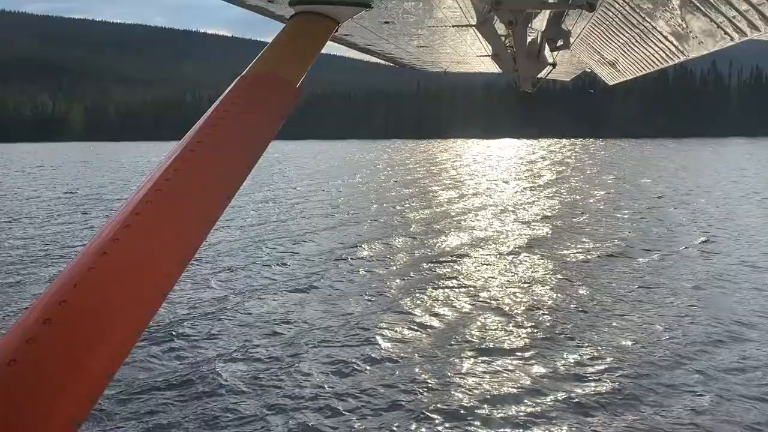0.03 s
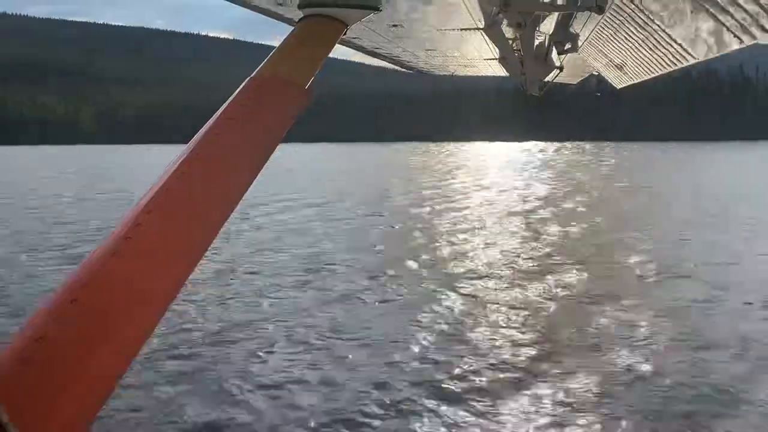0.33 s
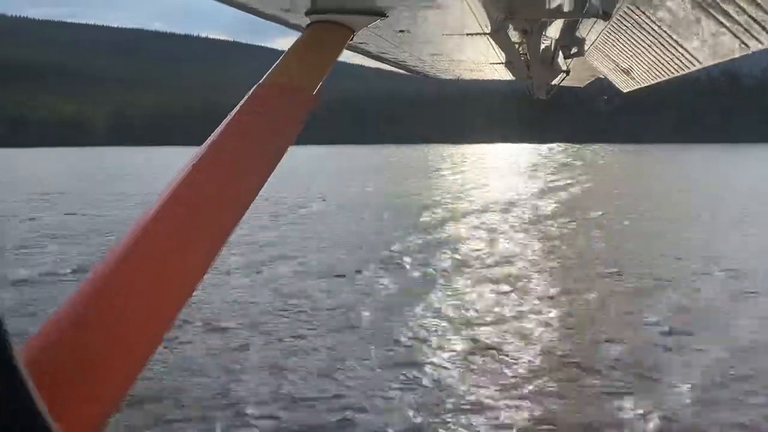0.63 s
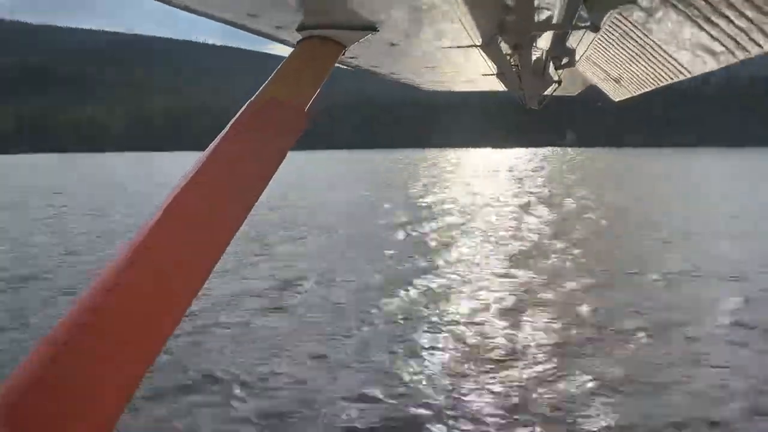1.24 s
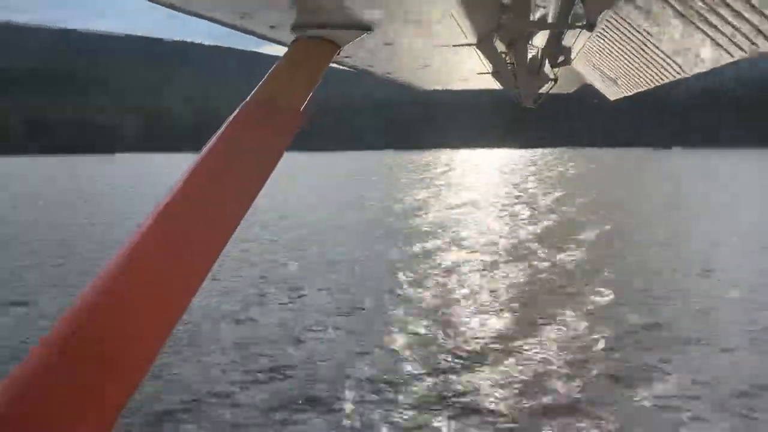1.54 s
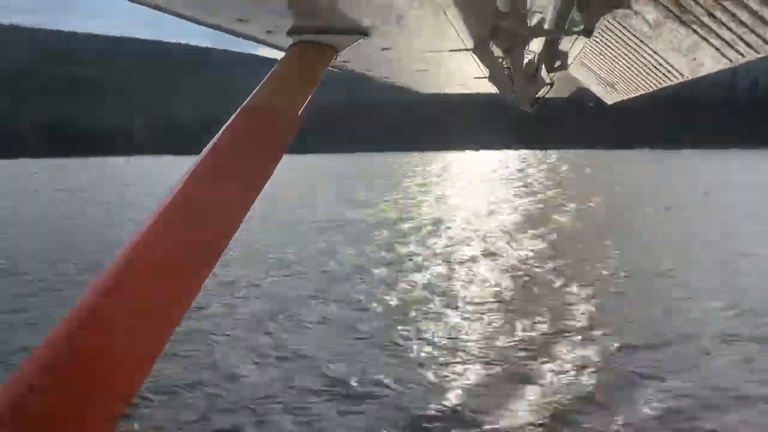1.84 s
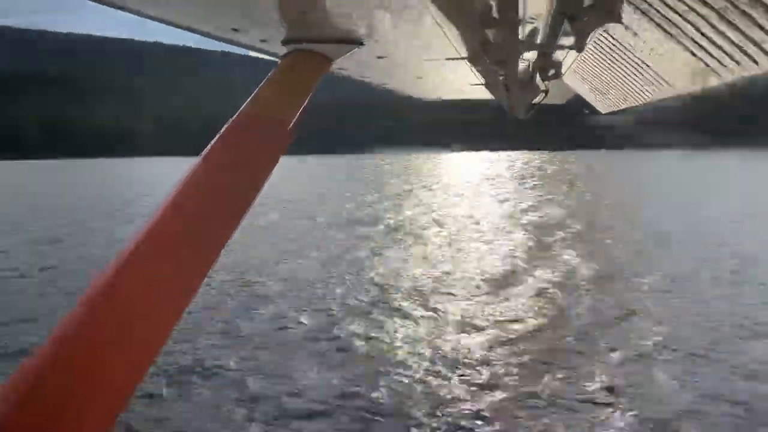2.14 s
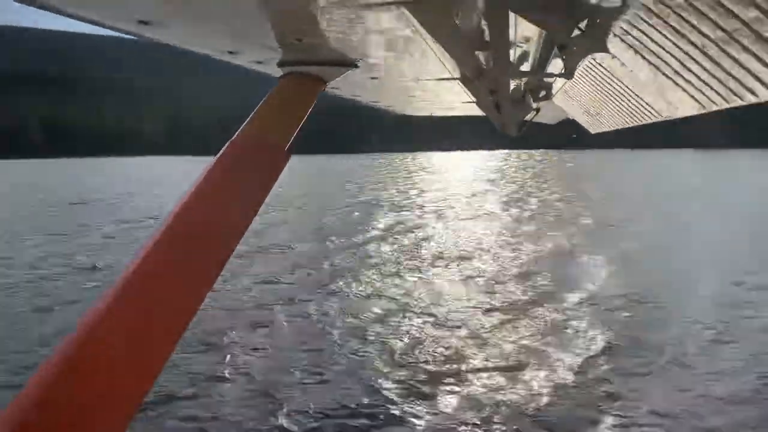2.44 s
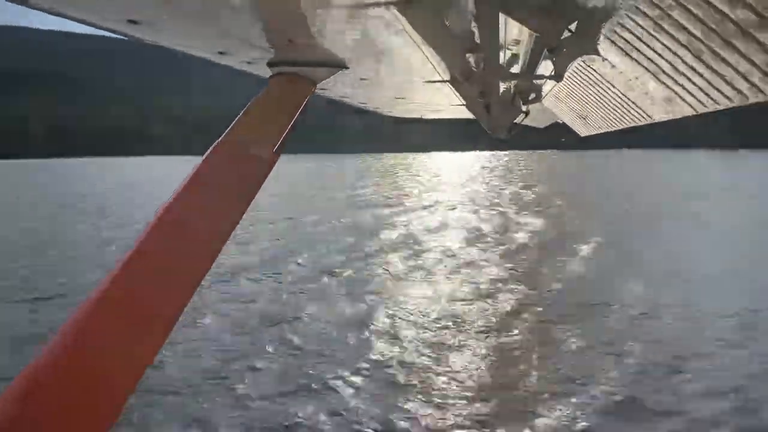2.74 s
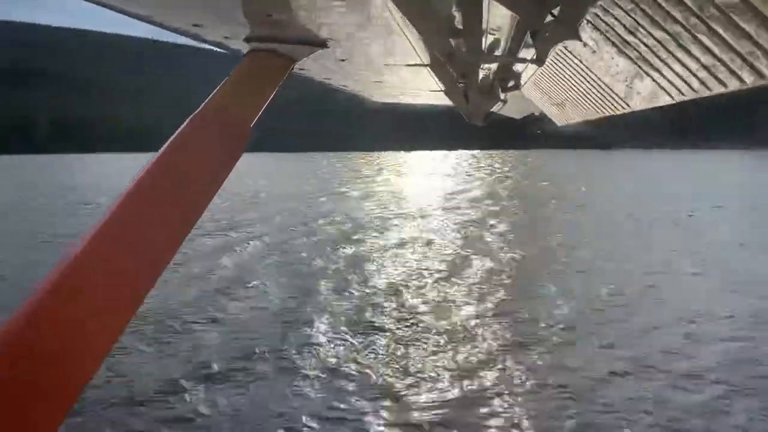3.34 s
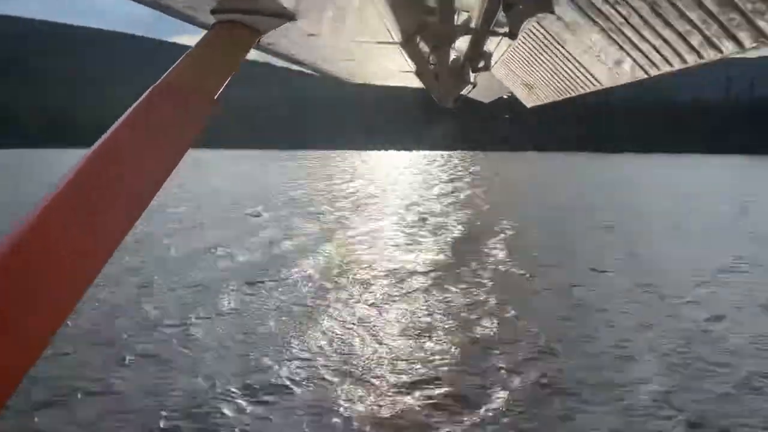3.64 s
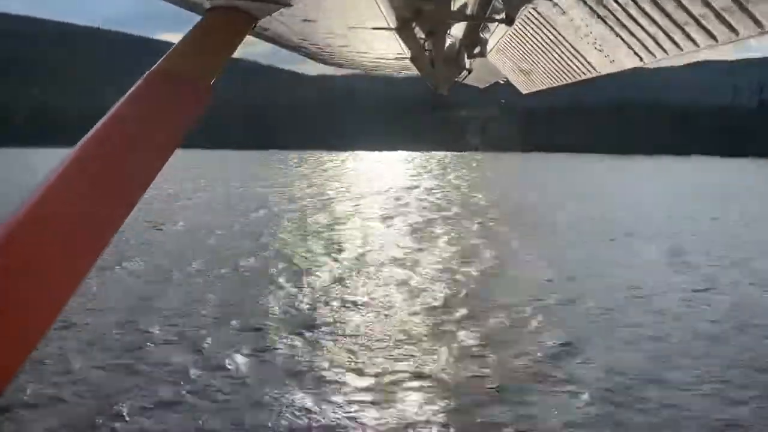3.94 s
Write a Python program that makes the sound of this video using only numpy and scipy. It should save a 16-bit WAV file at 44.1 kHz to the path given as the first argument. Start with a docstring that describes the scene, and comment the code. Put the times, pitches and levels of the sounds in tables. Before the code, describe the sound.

Steady propeller plane drone heard from the cabin, over buffeting wind and a faint high whine.

```python
"""In the cabin of a turboprop floatplane, beside an open side window, climbing low over a lake.
The propeller's blades beat out a steady drone whose overtones shift in balance. Under it the
slipstream buffets the microphone, roars, hisses and rings in the window opening, while the
compressor whines high above. A limiter holds the peaks."""
import sys
import numpy as np
from scipy import signal
from scipy.fft import rfft, irfft
from scipy.io import wavfile
from scipy.ndimage import uniform_filter1d, minimum_filter1d

SR = 44100
rng = np.random.default_rng(int(sys.argv[2]) if len(sys.argv) > 2 else 0)


def generate_wav(signal):
    """Clip the signal to [-1, 1] and save it as 16-bit WAV at the path in sys.argv[1]."""
    frames = np.transpose(np.atleast_2d(signal))
    scaled = np.clip(frames, -1, 1) * 32767
    pcm = np.round(scaled).astype(np.int16)
    wavfile.write(sys.argv[1], SR, pcm)


N = 176400
TIME_S, BIN_HZ = np.arange(N) / SR, np.arange(N // 2 + 1) * SR / N
LEFT_RIGHT = np.array([[1], [-1]])  # pushes the two channels opposite ways

# Stereo width of the air noise, with the treble hiss alternating between centred and out-of-phase bands
# (frequency [Hz], likeness [0-1], left phase lead [rad], left minus right [dB])
STEREO_WIDTH = [(60, .996, 0, -.6), (130, .97, .05, -.8), (280, .85, .3, -1.8), (450, .62, .4, -1.8),
                (620, .2, .5, -1), (1000, .17, 3.4, 0), (1750, .35, 4, 0), (2500, .6, 6.8, .8),
                (3300, .35, 7.1, 2.5), (5500, .3, 6.8, 3.5), (6900, .35, 6.3, 1.8), (7800, .6, 4.4, 1),
                (8450, .96, 3.1, 0), (9100, .65, 1.5, 0), (10050, .98, 0, 0), (11050, .75, -1.5, 0),
                (12050, .98, -3.1, 0), (13100, .75, -4.7, 0), (14000, .97, -6.3, 0), (15000, .75, -7.6, 0),
                (15500, .95, -9.3, 0)]
# Rings of the window opening (peak time [s], swell sigma [s], pitch [Hz], half width [Hz], level [dB])
WINDOW_RINGS = [(0.28, 0.39, 1540, 68, -40), (1.04, .5, 1480, 86, -43.5), (3.21, 0.29, 1960, 53, -42),
                (2.34, 0.44, 1880, 100, -47), (2.52, .25, 2500, 81, -49.5), (3.2, .4, 2630, 120, -52),
                (3.8, 0.18, 1220, 80, -44), (2.94, .5, 1120, 88, -41.5), (3.83, 0.21, 645, 70, -31),
                (1.95, 0.56, 555, 50, -35.5), (2.1, 0.46, 385, 33, -33), (.25, 0.33, 730, 180, -34.5),
                (3.38, 0.24, 346, 80, -31.5), (3.04, 0.14, 62, 8.4, -18)]
# Compressor tones (multiple of shaft speed [x], base level [dB], left minus right [dB])
COMPRESSOR_TONES = [(6, -63, 5), (8, -66.5, 5), (10, -62, 10), (16, -48.5, -0.5)]
# Fader ride on the highest whine (time [s], gain [dB])
WHINE_RIDE = [(.1, 3), (.7, 0), (1.1, -0.5), (1.5, 2), (1.68, 0), (1.85, 4.5), (2.03, -3), (2.25, 2.5),
              (2.45, -1), (2.68, 3), (2.85, 1), (3.15, -1.5), (3.45, -1), (3.95, 0)]
# Base tone colours of the slipstream's low, middle and top layers (frequency [Hz], density [dB/Hz])
BUFFET_SPECTRUM = [(8, -80), (18, -64), (27, -57), (32, -47.5), (46, -38.5), (60, -30.5), (76, -38),
                   (98, -34.5), (130, -40), (160, -49.5), (260, -65.5), (500, -102)]
ROAR_SPECTRUM = [(90, -75), (150, -50), (195, -42.5), (270, -50), (340, -47.5), (400, -48), (475, -48),
                 (515, -54.5), (570, -53), (660, -58.5), (750, -60.5), (1050, -60.5), (1280, -64),
                 (1500, -65), (1950, -71), (2200, -76.5), (2600, -76), (3500, -86), (6000, -105)]
HISS_SPECTRUM = [(900, -98), (2000, -79.5), (2700, -78), (4200, -81.5), (5200, -81.5), (6300, -82),
                 (7400, -84.5), (8800, -85), (10500, -81.5), (11600, -91.5), (13000, -90), (14000, -88.5),
                 (15700, -97)]
# Fader rides on the wind (time [s], buffet gain [dB], roar gain [dB], hiss gain [dB])
WIND_RIDES = [(.1, -8, 4, 5), (.4, -0.5, 1.5, 3.5), (.7, 0.5, 0.5, 1), (1.1, -1, -.5, 0.5),
              (1.4, 1.5, -1, -.5), (1.75, 3, 0, -0.3), (2.2, 0, -1, -1.2), (2.65, -0.5, -0.5, -0.5),
              (2.86, -6.5, -1.5, -1.5), (3.0, -1, -0.5, 0), (3.32, -1, -0.5, 0), (3.5, -2.5, -1, -1),
              (3.95, 0, 0.5, -1)]
# Brief puffs of hiss (peak time [s], half length [s], boost [dB])
HISS_PUFFS = [(0.924, 0.013, 4)]
# Body of the drone, harmonic by harmonic (time [s], first [dB], second [dB], third [dB], fourth [dB])
DRONE_LEVELS = [(.1, -10, -9.5, -23.3, -41), (.4, -12, -10, -23.5, -50), (.62, -12.5, -11, -23.5, -41),
                (.8, -10, -12, -24, -44), (1.15, -13, -12, -26, -38), (1.4, -15.5, -10.5, -25, -47),
                (1.58, -20.5, -12, -24.5, -44), (1.75, -10, -10.5, -21, -44),
                (1.88, -16.5, -10.5, -25.5, -48), (2.05, -11, -11.5, -26.5, -45),
                (2.5, -8.5, -16, -23.5, -45), (2.95, -10.5, -15, -24.2, -37), (3.1, -8, -19, -21, -26.5),
                (3.25, -8, -25.5, -29.5, -31), (3.42, -8.5, -24, -35, -23.5), (3.55, -7, -27, -36, -31.5),
                (3.75, -7.5, -23.5, -30.5, -33), (3.95, -10.5, -14.5, -29.5, -29.5)]
# Faint upper edge of the drone, plus a thin tone locked at twenty times the blade rate (multiple of blade rate
# [x], early level [dB], late level [dB])
DRONE_OVERTONES = [(5, -39.5, -35.5), (6, -48, -53), (7, -52, -54), (9, -54, -61), (20, -59, -59.5)]

SHAFT_HZ, SHAFT_WANDER, COMPRESSOR_BLADES = 630.43, 0.000178, 16  # wander: share of the speed
WHINE_SCATTER, WHINE_FLICKER_HZ = 0.79, 22
HALO_WIDTH_HZ, HALO_DB, HALO_FLICKER_DB = 220, -47, 1.5  # hiss around the highest whine
BLADE_HZ, BLADE_WANDER, ROAR_CHOP_DEPTH = 108.61, .0025, 0.081  # Hz: propeller blade passes a second
DRONE_FLUTTER_DB, OVERTONE_FLUTTER_DB, OVERTONE_SMEAR_RAD = 0.52, 4, 0.77
DRONE_PAN_DB, DRONE_LAG_S = -0.4, 0.00043  # stereo spread, growing with each harmonic
CROSSFADE_MID_S, CROSSFADE_LENGTH_S = 3.15, 0.15  # overtones go from early to late levels
START_S, FADE_IN_S, CEILING, LIMITER_S, HIGH_CUT_HZ = 0.07, 0.00054, .94, .008, 15600


def undb(db):
    """Decibels to gain."""
    return 10 ** (np.asarray(db) / 20)


def over_time(table):
    """Columns of a time table as automation lanes, joined by straight lines."""
    times, *columns = np.array(table, float).T
    return [np.interp(TIME_S, times, column) for column in columns]


def over_frequency(table):
    """Columns of a frequency table as curves over the FFT bins, joined on a log axis."""
    hz, *columns = np.array(table, float).T
    return [np.interp(np.log(BIN_HZ + 1), np.log(hz), column) for column in columns]


def wobble(rate_hz):
    """Smooth random modulation with a spread of 1, rolling off above rate_hz."""
    rolloff = np.exp(-(BIN_HZ / rate_hz) ** 2 / 2) * (BIN_HZ > 0)
    motion = irfft(rfft(rng.standard_normal(N)) * rolloff, N)
    return motion / motion.std()


def turbulence(density_db):
    """Stereo spectrum of air noise whose width changes from band to band."""
    likeness, lead, pan_db = over_frequency(STEREO_WIDTH)
    likeness = np.clip(likeness, 0, 1)
    mid, side = rfft(rng.standard_normal((2, N)))
    pair = mid * np.sqrt(1 + likeness) + LEFT_RIGHT * side * np.sqrt(1 - likeness)
    gain = undb(density_db + LEFT_RIGHT * pan_db / 2) * np.sqrt(SR) / 2
    return pair * np.exp(LEFT_RIGHT * 1j * lead / 2) * gain


def eddies(table, flicker_db, flicker_hz, swell_db):
    """Churning air whose octave bands flicker alone and swell together."""
    spectrum = turbulence(over_frequency(table)[0])
    octave = np.log2(np.clip(BIN_HZ, 32, 16384) / 32)
    air = 0
    for k in range(10):
        band = irfft(spectrum * np.maximum(1 - abs(octave - k), 0), N)
        air += band * undb(flicker_db * wobble(flicker_hz))
    return air * undb(swell_db * wobble(1.7))


def window_rings():
    """Air sweeping past the opening rings in narrow bands, each swelling and fading."""
    rings = 0
    for peak_s, sigma_s, hz, half_width_hz, db in WINDOW_RINGS:
        resonance_db = -20 * np.log10(1 + ((BIN_HZ - hz) / half_width_hz) ** 2)
        ring = irfft(turbulence(resonance_db), N)
        swell = np.exp(-((TIME_S - peak_s) / sigma_s) ** 2 / 2)
        rings += ring / ring.std() * undb(db) * swell
    return rings


def compressor():
    """The spinning shaft's shimmering whine; turbulence smears its blade tone into a halo of hiss."""
    shaft_phase = 2 * np.pi * np.cumsum(SHAFT_HZ * (1 + SHAFT_WANDER * wobble(1.46))) / SR
    ride = undb(over_time(WHINE_RIDE)[0])
    whine = 0
    for k, db, pan_db in COMPRESSOR_TONES:
        shimmer = 1 + WHINE_SCATTER * (wobble(WHINE_FLICKER_HZ) + 1j * wobble(WHINE_FLICKER_HZ))
        tone = np.real(shimmer * np.exp(1j * k * shaft_phase))
        tone = tone / tone.std() * (ride if k == COMPRESSOR_BLADES else 1)
        whine += tone * undb(db + LEFT_RIGHT * pan_db / 2)
    offset_hz = BIN_HZ - COMPRESSOR_BLADES * SHAFT_HZ
    halo = irfft(turbulence(-10 * np.log10(1 + (2 * offset_hz / HALO_WIDTH_HZ) ** 2)), N)
    return whine + ride * halo / halo.std() * undb(HALO_DB + HALO_FLICKER_DB * wobble(13))


def slipstream(blade_phase):
    """The wind bed: low buffeting, a roar chopped by the blades, and hiss at the window edge."""
    buffet_db, roar_db, hiss_db = over_time(WIND_RIDES)
    for peak_s, half_length_s, boost_db in HISS_PUFFS:
        hiss_db += boost_db * np.exp(-((TIME_S - peak_s) / half_length_s) ** 2)
    buffet = eddies(BUFFET_SPECTRUM, flicker_db=.5, flicker_hz=6.5, swell_db=0.45) * undb(buffet_db)
    roar = eddies(ROAR_SPECTRUM, flicker_db=0.85, flicker_hz=20, swell_db=0.32) * undb(roar_db)
    hiss = eddies(HISS_SPECTRUM, flicker_db=0.64, flicker_hz=43, swell_db=0.6) * undb(hiss_db)
    chop = 1 + ROAR_CHOP_DEPTH * np.sin(blade_phase)
    return buffet + roar * chop + hiss


def propeller(blade_phase):
    """Blade pulses as a drone of clean harmonics; the upper ones waver in the rough air."""
    drone = 0
    for k, db in enumerate(over_time(DRONE_LEVELS), 1):
        lead = np.pi * BLADE_HZ * DRONE_LAG_S * (k - 1)
        level_db = db + DRONE_FLUTTER_DB * wobble(8.8) + LEFT_RIGHT * k * DRONE_PAN_DB / 2
        drone += np.sin(k * blade_phase + LEFT_RIGHT * lead) * undb(level_db)
    crossfade = np.clip((TIME_S - CROSSFADE_MID_S) / CROSSFADE_LENGTH_S + .5, 0, 1)
    for k, early_db, late_db in DRONE_OVERTONES:
        smear = OVERTONE_SMEAR_RAD * np.array([wobble(2.6), wobble(6.9)])  # left, right
        level_db = early_db + (late_db - early_db) * crossfade + OVERTONE_FLUTTER_DB * wobble(6.8)
        drone += np.sin(k * blade_phase + smear) * undb(level_db)
    return np.sqrt(2) * drone


def scene():
    """The cabin mix; one blade rhythm drives both the drone and the chop in the roar."""
    blade_phase = 2 * np.pi * np.cumsum(BLADE_HZ * (1 + BLADE_WANDER * wobble(5.4))) / SR
    return propeller(blade_phase) + compressor() + slipstream(blade_phase) + window_rings()


def record(dry):
    """The sound snaps in, a look-ahead limiter holds the peaks, and a steep filter trims the top."""
    live = dry * np.clip((TIME_S - START_S) / FADE_IN_S, 0, 1)
    span = int(LIMITER_S * SR)
    needed_gain = np.minimum(1, CEILING / (abs(live).max(axis=0) + 1e-9))
    held_gain = minimum_filter1d(needed_gain, 2 * span)
    smooth_gain = uniform_filter1d(uniform_filter1d(held_gain, span), span)
    high_cut = signal.ellip(10, .2, 80, HIGH_CUT_HZ, fs=SR, output="sos")
    return signal.sosfilt(high_cut, live * smooth_gain)


dry = scene()
out = record(dry)
generate_wav(out)
```